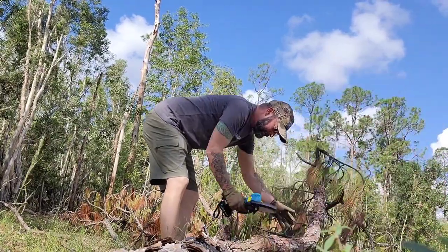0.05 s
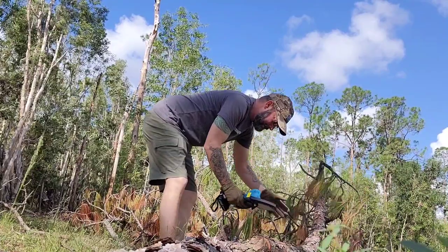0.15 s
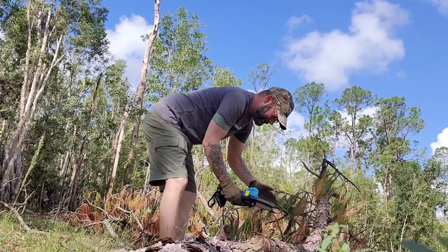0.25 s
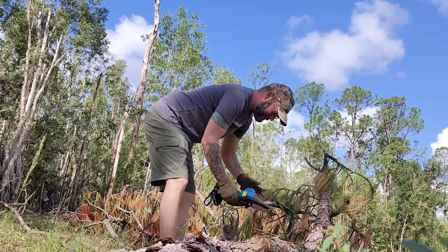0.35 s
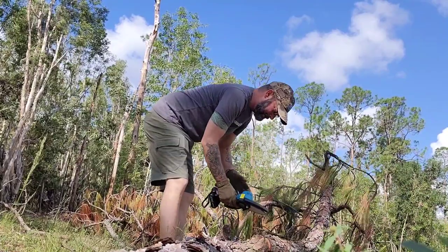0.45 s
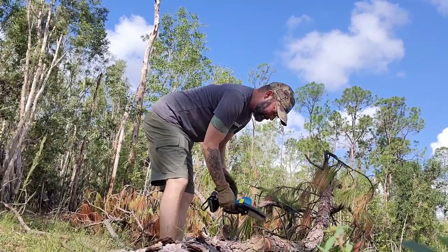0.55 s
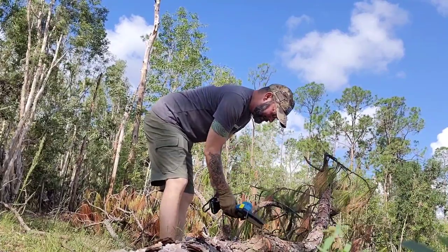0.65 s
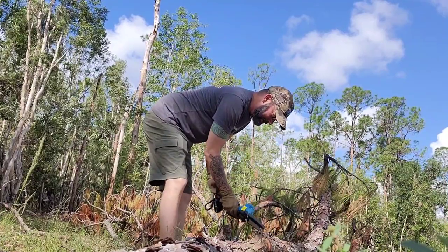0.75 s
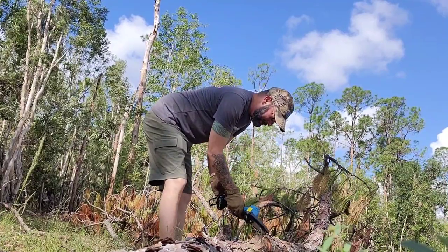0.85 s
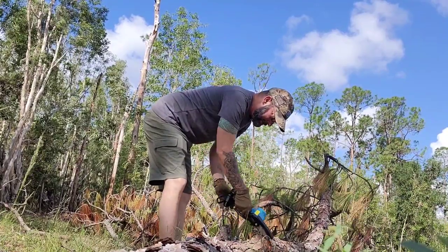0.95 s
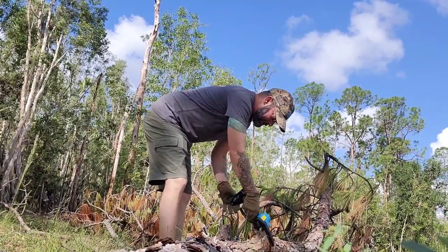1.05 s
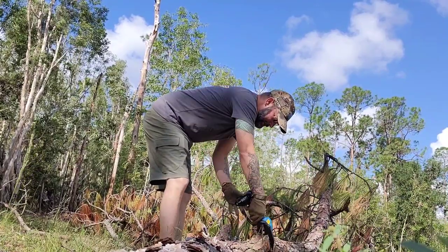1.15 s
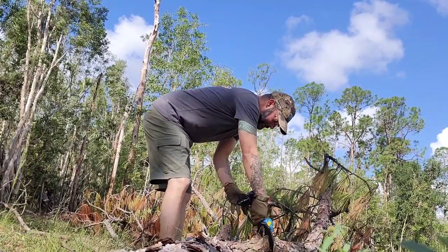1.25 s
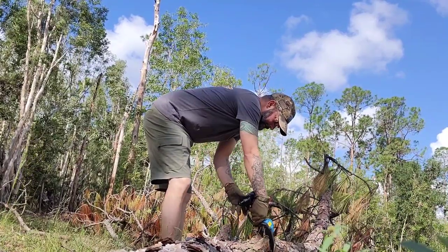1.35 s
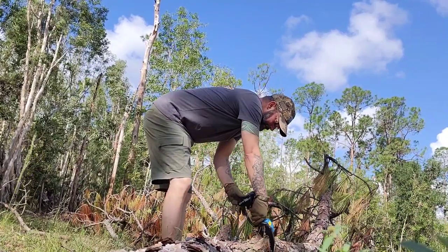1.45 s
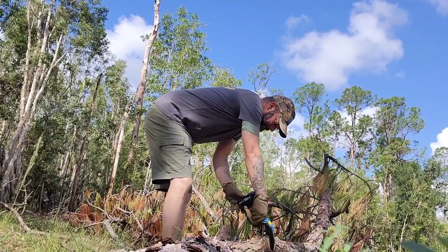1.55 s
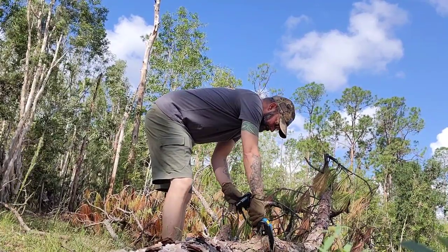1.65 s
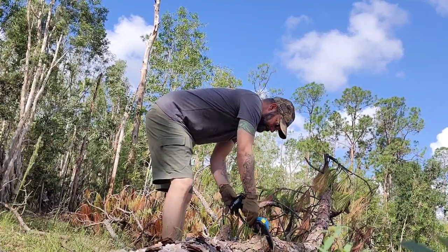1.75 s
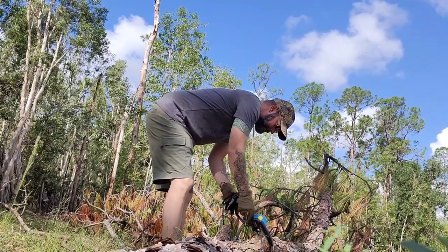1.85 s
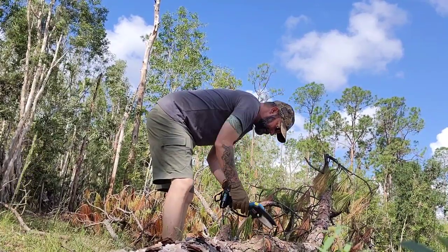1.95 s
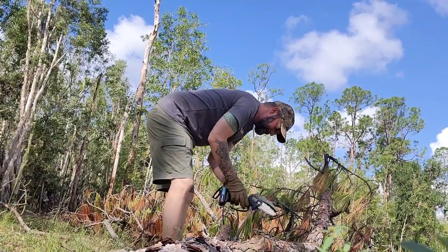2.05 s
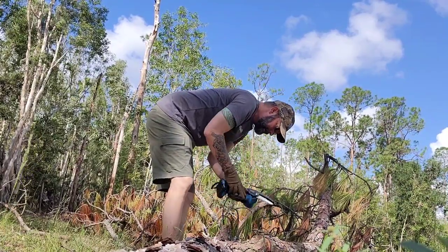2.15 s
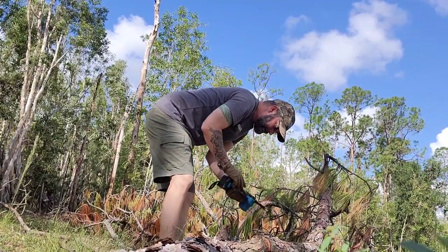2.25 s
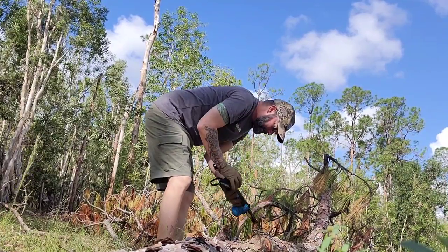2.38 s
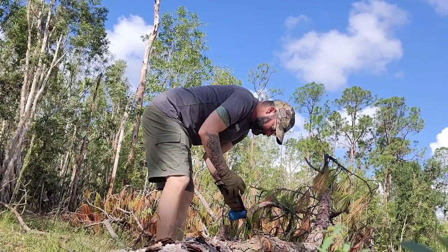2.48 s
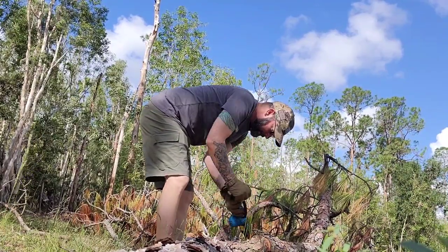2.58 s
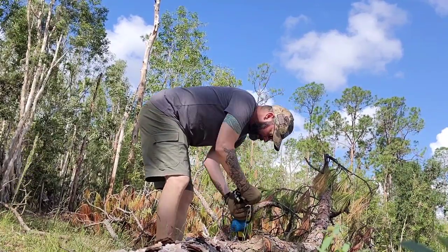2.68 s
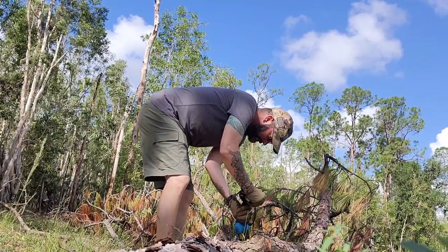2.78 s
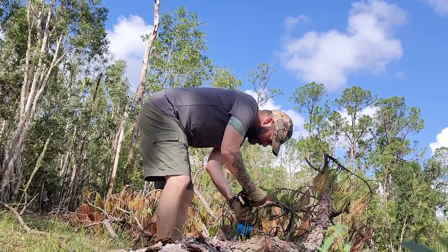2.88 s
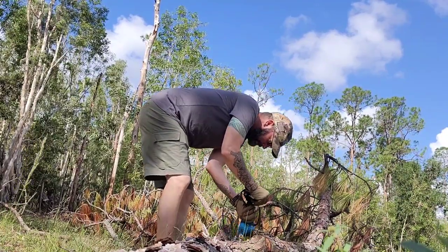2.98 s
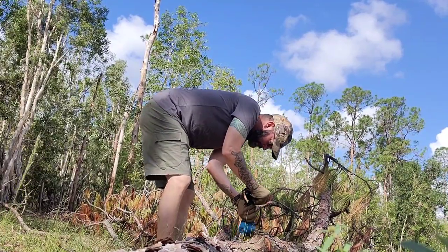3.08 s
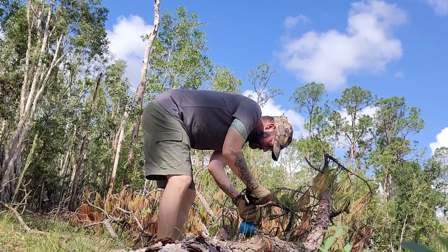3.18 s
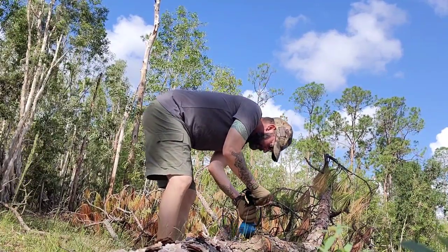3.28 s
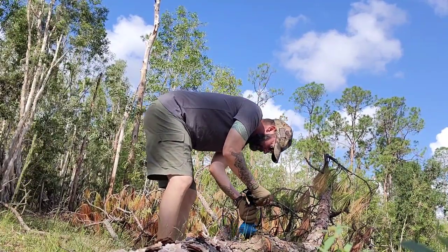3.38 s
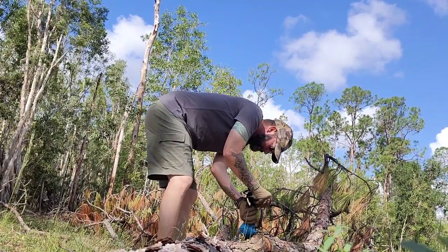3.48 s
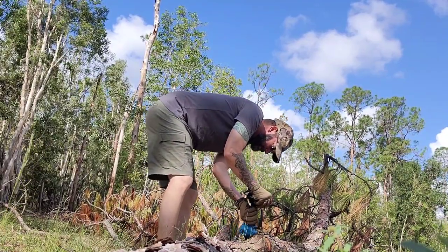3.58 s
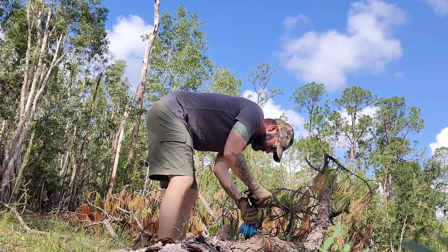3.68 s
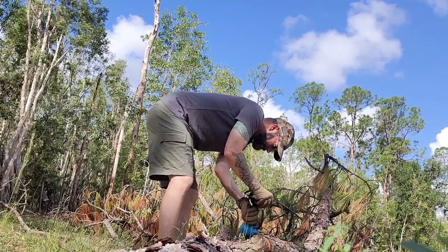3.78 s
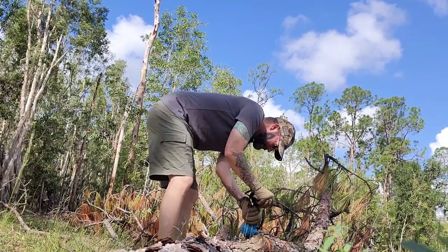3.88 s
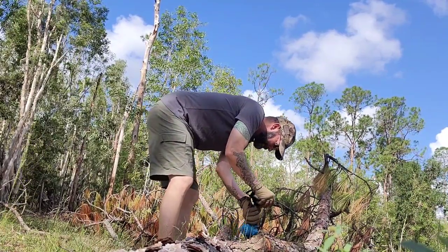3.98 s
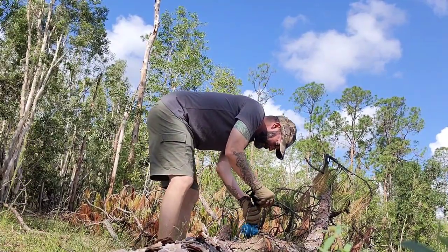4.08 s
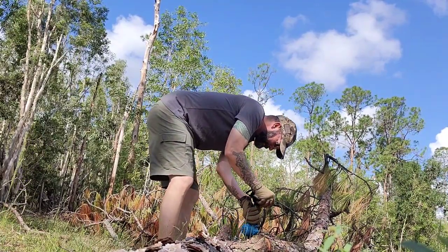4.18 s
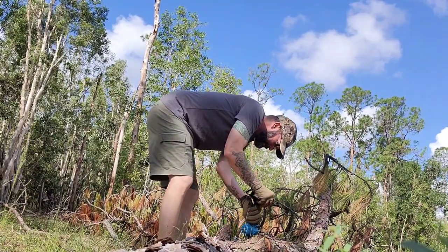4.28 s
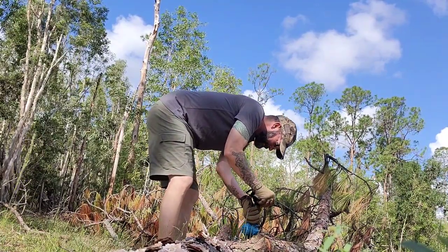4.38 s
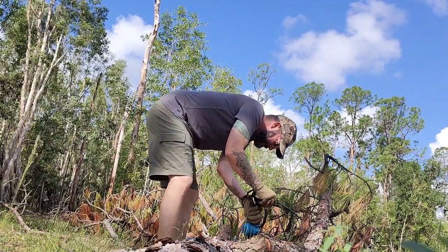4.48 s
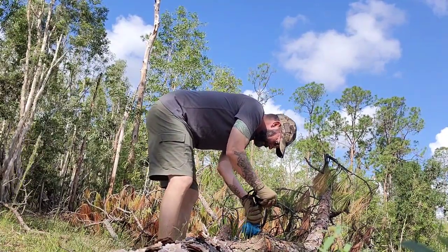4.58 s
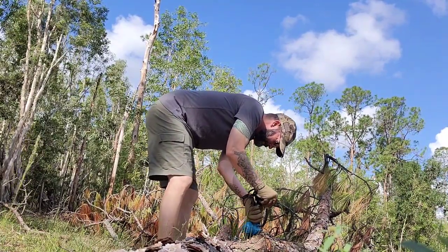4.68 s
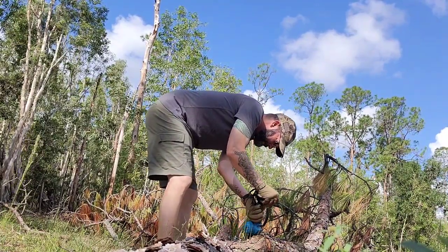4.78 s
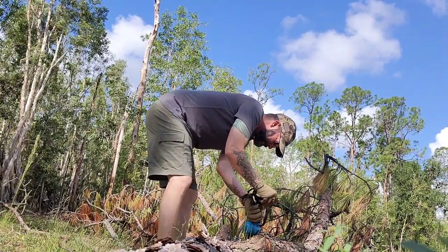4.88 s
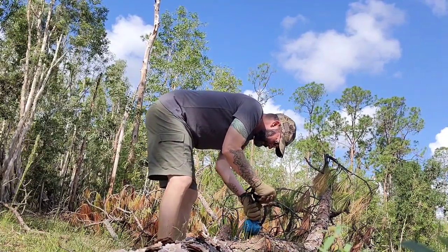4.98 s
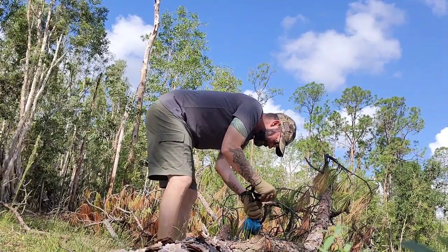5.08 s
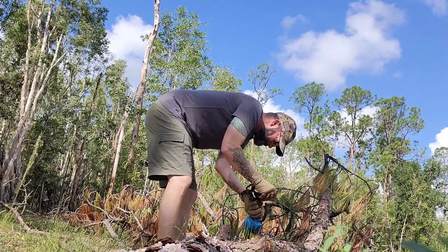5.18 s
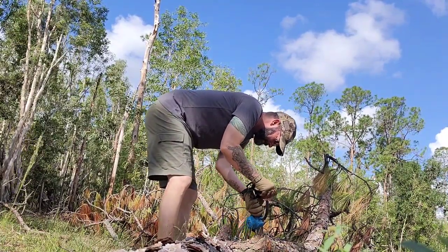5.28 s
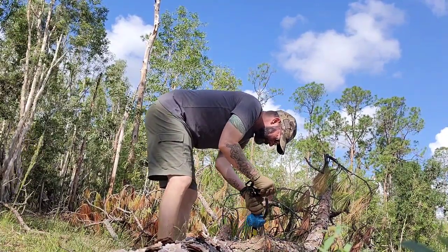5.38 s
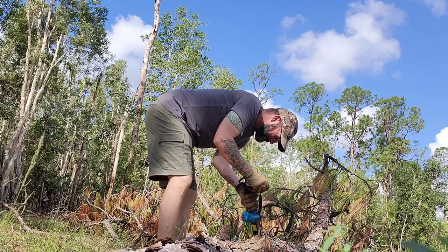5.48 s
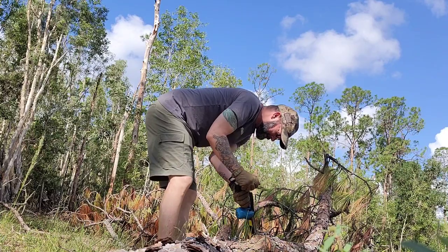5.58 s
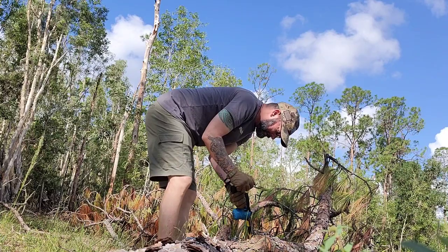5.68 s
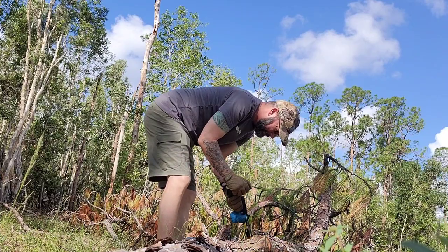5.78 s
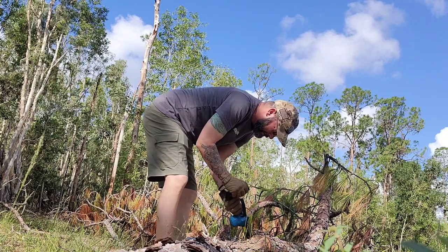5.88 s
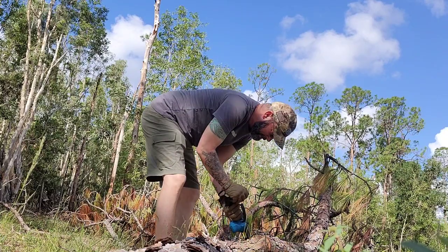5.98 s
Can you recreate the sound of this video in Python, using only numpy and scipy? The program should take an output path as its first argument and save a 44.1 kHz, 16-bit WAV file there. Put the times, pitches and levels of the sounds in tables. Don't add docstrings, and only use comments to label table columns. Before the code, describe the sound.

In an open clearing, closely heard, a small electric chainsaw has just been released: its chain rattles and hisses, slowing to rest by about 1 second. At 0.06 a branch breaks with a very loud, short, woody crack, followed by lesser snaps until 0.25. From 1 to 2.9 it is quiet: a distant engine idles low and steady, insects hiss faintly, and twigs tick, with small knocks near 1.25 and a dry stem crackling at 2.2. At 2.93 the trigger clicks and the motor spins up quickly with a whine. The chain bites the log, tearing and growling, with a hard knock at 3.45; it bogs and shudders around 3.5 to 3.9 and labours on. Harder bites come at 4.8 to 5.2. After 5.35 it breaks free, speeding into a bright rattle, hiss and whine, peaking around 5.7, with the cutting sound returning slightly at the end, around 6.

```python
import sys
import numpy as np
from scipy import signal
from scipy.fft import rfft, irfft, next_fast_len
from scipy.io import wavfile

SR = 44100
rng = np.random.default_rng(int(sys.argv[2]) if len(sys.argv) > 2 else 0)


def unload_wav(signal):
    wavfile.write(
        sys.argv[1],
        SR,
        np.round(np.clip(np.atleast_2d(signal).T, -1, 1) * 32767).astype(np.int16),
    )


def ratio(d):
    e = np.asarray(d, float) / 20
    return 10 ** e


N = 266364
TIME = np.arange(N) / SR


def rms_one(x):
    return x / np.sqrt(np.mean(x ** 2) + 1e-20)


def sine(turns):
    return np.sin(2 * np.pi * turns)


def in_time(rows):
    s, *columns = np.transpose(rows)
    return [np.interp(TIME, s, c) for c in columns]


def at_hz(points, hz):
    table_hz, db = np.transpose(points)
    return np.interp(np.log(np.maximum(hz, 1)), np.log(table_hz), db)


def drift(rate_hz):
    r = np.exp(-32 * np.pi * rate_hz / SR)
    slow = signal.lfilter([1], [1, -2 * r, r * r], rng.standard_normal(N // 16 + 3001))[3000:]
    return np.interp(np.arange(N) / 16, np.arange(len(slow)), rms_one(slow))


def colour(x, spectrum):
    cepstrum = irfft(np.log(ratio(at_hz(spectrum, np.linspace(0, SR / 2, 4097)))))
    cepstrum[1:4096] *= 2
    cepstrum[4097:] = 0
    return rms_one(signal.fftconvolve(x, irfft(np.exp(rfft(cepstrum))))[:N])


def resonate(x, hz, width_hz):
    r = np.exp(-np.pi * width_hz / SR)
    b = np.array([1, 0, -1]) * (1 - r * r) / 2
    return signal.lfilter(b, [1, -2 * r * np.cos(2 * np.pi * hz / SR), r * r], x)


def noise_band(hz, width_hz):
    return rms_one(resonate(resonate(rng.standard_normal(N), hz, width_hz), hz, width_hz))


def grains(per_s, spread_db):
    sizes = ratio(spread_db * np.minimum(rng.exponential(1, N), 5)) * rng.choice([-1, 1], N)
    return rms_one(sizes * (rng.random(N) < per_s / SR))


def spells(rows):
    levels_db = []
    for start_s, end_s, db, swell, fade in rows:
        before_s, after_s = np.maximum(start_s - TIME, 0), np.maximum(TIME - end_s, 0)
        levels_db.append(db - abs(swell) * before_s - abs(fade) * after_s)
    return np.max(levels_db, axis=0)


# time_s, rate_hz
CUTTER_RATE = [(3.05, 122), (3.12, 132), (3.19, 137), (3.3, 135.5), (3.47, 125.5), (3.6, 117), (3.75, 117),
               (3.95, 108), (4.25, 111.5), (4.36, 120), (4.7, 103), (4.9, 112), (4.99, 119.8),
               (5.16, 118.5), (5.22, 126), (5.34, 128.5), (5.44, 139.5), (5.62, 141.7)]
TRIGGER_S = 2.922


def coasting_and_driven():
    coast_s, stop_s, spin_up_s = 0.5, 0.98, 0.05
    coasting = np.exp(-TIME / coast_s) * np.clip(1 - TIME / stop_s, 1e-4, 1)
    driven = np.clip(1 - np.exp(-np.maximum(TIME - TRIGGER_S, 0) / spin_up_s), 1e-4, 1)
    return coasting, driven


def chain_speed(coasting, driven):
    coast_hz = 60.06
    first_s, first_hz = CUTTER_RATE[0]
    starting = coast_hz * coasting + first_hz * driven / driven[round(first_s * SR)]
    return np.where(TIME < first_s, starting, in_time(CUTTER_RATE)[0])


COAST_LEVEL = [-42.5, -44.5, -50, -42.5]
SPEED_EXPONENT = [1.4, 1.23, 1.02, 1.6]
# time_s, bite_db, bar_clear_of_kerf_db
CUT_COURSE = [(2.95, -62, -1), (3.04, -52, -0.5), (3.28, -46.5, 1), (3.5, -44.5, -0.5), (3.7, -41, 3),
              (4.0, -39, 0.9), (4.3, -39, 3), (4.72, -37, 5.5), (4.77, -35.5, 5.5), (4.92, -41.5, 1.5),
              (5.12, -36, 7), (5.22, -45.5, 8.5), (5.34, -37.5, 8.5), (5.37, -60, 5.5), (5.62, -79, 12.5),
              (5.92, -55, 9), (6.04, -47, 4)]
# time_s, extra_bite_db, length_s
HARD_SPOTS = [(3.05, 10, .02), (3.345, 6.5, 0.032), (3.447, 6.5, 0.033), (3.55, 9, 0.055), (3.79, 4, 0.11),
              (3.933, 9.5, 0.0095), (4.203, 5.5, 0.077), (4.35, 3.5, .04), (4.746, 1, .015),
              (4.85, 10.5, 0.11), (5.04, 7.5, 0.063), (5.245, 13, 0.016), (5.31, 0.5, 0.0076)]


def layer_levels(coasting, driven):
    bite_db, clear_db = in_time(CUT_COURSE)
    grab_db = sum(db * np.exp(-((TIME - s) / length_s) ** 2) for s, db, length_s in HARD_SPOTS)
    running = [bite_db + grab_db,
               -38 + 0.13 * clear_db + 0.22 * grab_db,
               -47.5 + 0.78 * clear_db + 0.46 * grab_db,
               -41.5 + clear_db + 0.5 * grab_db]
    return [np.maximum(start_db + 20 * steep * np.log10(coasting), run_db + 20 * np.log10(driven))
            for start_db, steep, run_db in zip(COAST_LEVEL, SPEED_EXPONENT, running)]


def cutter_knocks(turns, log_db):
    contact_db, span_db = -52, 10
    passes = np.diff(np.floor(turns + 0.025 * drift(60)), prepend=0) > 0
    clicks = rms_one(passes * ratio(1.28 * rng.standard_normal(N)))
    return clicks * np.clip((log_db - contact_db) / span_db, 0, 1)


# freq_hz, density_db
LOG_RING = [(88, -66.5), (150, -11), (210, -2), (225, -6.5), (286, -7.5), (352, 0), (412, -6), (483, -4.5),
            (571, -3), (618, -9), (732, -1), (816, -0.5), (1170, -9), (1600, -13.5), (2080, -35.5),
            (3520, -120)]


def torn_log(knocks, log_db, growl_db):
    loosening_db = np.clip(0.4 * (growl_db + 52), 0, 5)
    tearing = grains(2500, spread_db=3.5) * ratio(1.5 * drift(25))
    return ratio(log_db - loosening_db) * colour(0.5 * knocks + tearing, LOG_RING)


# freq_hz, density_db
LINK_RING = [(530, -17.5), (900, -9.5), (1100, -6.5), (1290, -11.5), (1640, 3), (1910, -4), (2090, 2),
             (2290, 1.5), (2870, -1), (3370, -13.5), (3800, -14.5), (4180, -16), (4500, -15.5), (5850, -28),
             (9900, -120)]


def link_rattle(knocks, rattle_db, swing):
    gain = ratio(rattle_db + 0.91 * drift(28)) * swing
    return [gain * colour(grains(5000, spread_db=2) + 0.15 * knocks, LINK_RING) for part in range(3)]


# freq_hz, density_db
GROOVE_HISS = [(2650, -45.5), (4500, -11), (5170, -2), (5390, 1), (5830, -11.5), (6560, -0.5), (7300, 0.5),
               (7900, 2.5), (9230, -4), (10100, -3), (11400, -26), (12000, -10), (15600, -32),
               (22000, -120)]
# freq_hz, density_db
CHIP_SPRAY = [(6940, -37), (11800, -3.5), (12300, -7), (12800, 0), (15100, 3), (15800, -2)]


def groove_hiss(hiss_db, spray_db, swing):
    flicker = ratio(drift(60)) * swing
    parts = []
    for part in range(3):
        sizzle = grains(12000, spread_db=3.5)
        hiss = ratio(hiss_db) * colour(sizzle, GROOVE_HISS)
        spray = ratio(spray_db) * colour(sizzle, CHIP_SPRAY)
        parts.append(flicker * (hiss + spray))
    return parts


# multiple, level_db
GROWL_ORDERS = [(1, -18), (2, -8), (3, -17), (4, -2), (5, -12), (6, -2), (7, -1), (8, -1), (9, -11),
                (10, -9), (11, -14), (12, -7), (13, -11)]


def cutter_growl(turns, growl_db):
    uneven = turns + 0.005 * drift(25)
    growl = np.zeros(N)
    for k, db in GROWL_ORDERS[1:]:
        growl += ratio(db + 2.95 * drift(3.2)) * np.sin(2 * np.pi * k * uneven + k * k)
    return ratio(growl_db) * growl


# cutter_rate_multiple, level_db
SPROCKET_LINES = [(4, -11), (4.57, -18), (8.57, -7), (10, -12), (12, -7), (12.57, -7)]


def sprocket_whine(turns, whine_db):
    turns = turns + 0.0041 * drift(27)
    whine = ratio(2.6 * drift(10)) * sine(8 * turns)
    for k, db in SPROCKET_LINES:
        whine += ratio(db + 2.5 * drift(15)) * sine(k * turns)
    bar_ring = 1.4 * ratio(whine_db + 42) * noise_band(1740, 300)
    return ratio(whine_db) * (whine + bar_ring)


def handle_shudder(turns, shudder_db):
    shake = sine(turns) + 0.45 * rms_one(resonate(rng.standard_normal(N), 65, 70))
    return ratio(shudder_db + 2.9 * drift(10)) * shake


def motor_whine(turns, motor_db):
    return ratio(motor_db + 5 + 3 * drift(25)) * sine(40.5 * (turns + 0.0025 * drift(40)))


# start_s, end_s, level_db, swell_db_per_s, fade_db_per_s
GROWL_SPELLS = [
    (3.25, 4.7, -52, 30, 100),
    (4.78, 5.0, -39.5, 130, 80),
    (5.0, 5.17, -42, 50, 200),
    (5.19, 5.335, -46, 200, 500),
]
WHINE_SPELLS = [
    (3.08, 3.42, -48.5, 200, 100),
    (4.78, 5.3, -50, 180, 100),
    (5.62, 5.87, -42, 20, 150),
    (5.38, 6.04, -52, 150, 50),
]
SHUDDER_SPELLS = [
    (3.5, 3.87, -47, 60, 60),
    (3.9, 4.4, -55, 50, 25),
]
MOTOR_SPELLS = [
    (3.08, 3.56, -54.5, 150, 130),
    (5.2, 5.38, -58, 90, 60),
]


def saw():
    coasting, driven = coasting_and_driven()
    turns = np.cumsum(chain_speed(coasting, driven)) / SR
    log_db, rattle_db, hiss_db, spray_db = layer_levels(coasting, driven)
    power_db = np.where(TIME > TRIGGER_S, 0, -80)
    growl_db = spells(GROWL_SPELLS) + power_db
    whine_db = spells(WHINE_SPELLS) + power_db
    shudder_db = spells(SHUDDER_SPELLS) + power_db
    motor_db = spells(MOTOR_SPELLS) + power_db

    knocks = cutter_knocks(turns, log_db)
    swing = 1 + 0.051 * np.cos(2 * np.pi * turns)
    rattle = link_rattle(knocks, rattle_db, swing)
    hiss = groove_hiss(hiss_db, spray_db, swing)
    tones = sprocket_whine(turns, whine_db) + handle_shudder(turns, shudder_db)
    tones += motor_whine(turns, motor_db) + cutter_growl(turns, growl_db)
    direct = torn_log(knocks, log_db, growl_db) + rattle[0] + hiss[0] + np.sqrt(2) * tones
    return direct, ratio(-6.5) * np.array(rattle[1:]) + ratio(-4) * np.array(hiss[1:])


# multiple, level_db
ENGINE_ORDERS = [(1, -19), (2, -36), (3, -4.5), (4, -6), (5, 0), (6, -6), (7, -19), (8, -10), (9, -34.5),
                 (10, -22), (11, -7.5), (12, -16.5), (13, -16), (14, -15.5), (15, -39.5), (16, -20.5),
                 (17, -18.5), (18, -22), (19, -24.5), (20, -24.5), (21, -18), (22, -23), (23, -21),
                 (24, -17.5)]
# freq_hz, side_over_mid_db
ENGINE_SIDE = [(30, -4.5), (60, -2), (125, -11), (250, -1), (400, -3)]
# time_s, level_db
ENGINE_LEVEL = [(0, -52.5), (3.4, -51.5), (5.4, -52.5), (6.04, -60)]


def idling_engine():
    idle_hz = 16.15
    turns, out = idle_hz * TIME + 0.015 * drift(1.84), np.zeros((2, N))
    for (k, db), start in zip(ENGINE_ORDERS, rng.random(len(ENGINE_ORDERS))):
        twist = np.arctan(ratio(at_hz(ENGINE_SIDE, k * idle_hz)))
        tone = np.sin(2 * np.pi * (k * turns + start) + np.array([[twist], [-twist]])) / np.cos(twist)
        out += ratio(-2 + db + 2.2 * drift(2.3)) * tone
    return out * ratio(in_time(ENGINE_LEVEL)[0])


# freq_hz, density_db
AIR_MID = [(15, -41.5), (25, -0.5), (86, -5), (148, -26), (184, -13), (254, -32), (351, -33.5),
           (472, -17.5), (602, -28), (2320, -42.5), (2650, -44), (3660, -36.5), (7580, -34), (10500, -43.5),
           (15700, -48)]
# freq_hz, density_db
AIR_WIDTH = [(15, -38), (25, -22), (86, -10), (113, -24.5), (184, -20), (247, -23), (424, -38.5),
             (472, -17), (602, -26.5), (854, -23.5), (2650, -41.5), (3860, -33), (8000, -27), (10200, -41),
             (15700, -44.5)]
# freq_hz, width_hz, level_db
INSECT_BANDS = [(4000, 900, -75), (4560, 33, -80), (5590, 79, -74), (5960, 390, -80), (6500, 50, -73.5),
                (7200, 110, -73.5), (7780, 130, -73.5), (8430, 640, -70.5)]


def clearing():
    mid = ratio(-56) * colour(rng.standard_normal(N), AIR_MID)
    side = ratio(-63.5) * colour(rng.standard_normal(N), AIR_WIDTH)
    out = mid + side * [[1], [-1]]
    for hz, width_hz, db in INSECT_BANDS:
        song = resonate(resonate(rng.standard_normal((2, N)), hz, width_hz), hz, width_hz)
        out += ratio(db + 2 * drift(2.5)) * rms_one(song)
    return out


# time_s, peak_db, ring_hz, brightness_db, t60_s
BRANCH_BREAK = [
    (.052, -29, 750, -25, .03),
    (.0578, -25, 780, -25, .02),
    (.0624, 0, 760, -38, .017),
    (.062, -14, 330, -35, .05),
    (.061, -20, 180, -40, .07),
    (.063, -15, 540, -35, .035),
    (.0668, -27, 7000, -8, .01),
    (.0688, -24, 640, -22, .04),
    (.077, -30, 900, -25, .025),
]
WOOD_SNAPS = [(0.136, -23, 751, -15, 0.038), (0.206, -28.5, 840, -26, 0.072),
              (0.229, -24.5, 727, -16, 0.024), (0.545, -39, 846, -20, .04), (0.59, -44, 900, -20, .03),
              (0.71, -45, 810, -20, 0.04), (1.179, -61, 480, 0, 0.02), (1.243, -32.5, 517, -16, 0.027),
              (1.313, -31, 680, -24, 0.022), (2.209, -25.5, 564, -16, 0.02), (2.225, -30.5, 750, -7, 0.027),
              (3.03, -30.5, 754, -15, 0.07), (3.449, -15.5, 535, -14, 0.039), (3.959, -26, 595, -7, 0.024),
              (4.078, -37, 778, -11, 0.015)]
TWIG_TICKS = [(0.0623, -17.5, 2600, -0.5, 0.011), (0.0664, -17, 2830, -29, 0.0095),
              (0.341, -41, 2120, -4, 0.098), (0.5694, -54, 2120, -9, 0.025), (0.6194, -51, 2570, 2, 0.013),
              (0.7294, -60, 2010, -11, 0.032), (0.8387, -54, 1590, -7, 0.054), (1.029, -50, 1860, 5, 0.018),
              (1.1808, -40, 1850, -8, 0.016), (1.248, -45, 1750, -11, 0.02),
              (1.2576, -45.5, 2490, -8, 0.026), (1.314, -38, 1800, -21, 0.021),
              (1.688, -52.5, 2460, -12, 0.029), (1.7305, -54, 2260, -11, 0.023),
              (1.75, -50.5, 2100, -16, 0.031), (1.8442, -40, 1950, 0, 0.014), (1.85, -41.5, 1560, -21, .03),
              (2.1704, -52, 2000, -18, 0.023)]
STEM_AND_TRIGGER = [
    (2.2024, -44, 2740, -19, 0.022),
    (2.2105, -28.5, 2410, -40, 0.039),
    (2.2144, -28, 2370, -27, 0.027),
    (2.224, -34, 2450, -26, 0.015),
    (2.2264, -24.5, 2340, -28, 0.017),
    (2.2394, -46, 2400, -10, 0.034),
    (2.2774, -53, 2450, -8, 0.061),
    (2.8933, -49, 2470, -19, 0.053),
    (2.9307, -37.5, 2840, -12, 0.042),
]


def snaps():
    out, t = np.zeros(N + 4000), np.arange(4000) / SR
    breaks = list(BRANCH_BREAK) + list(WOOD_SNAPS) + list(TWIG_TICKS) + list(STEM_AND_TRIGGER)
    for s, peak_db, hz, bright_db, t60_s in breaks:
        noise = rng.standard_normal(4000)
        fall = ratio(-60 * t / np.clip(t60_s, 0.003, 0.09)) * (1 - np.exp(-1.6 * hz * t))
        ring = sine(hz * t) * fall ** 2.5
        splinter = 1.59 * resonate(noise * fall, hz, 0.55 * hz)
        tick = ratio(bright_db - 0.5) * np.diff(noise, prepend=0) * fall ** 2
        i = round(s * SR)
        out[i:i + 4000] += ratio(peak_db + 3) * (0.8 * ring + 0.5 * splinter + tick)
    return out[:N]


# freq_hz, left_over_right_db
PORT_LEVEL = [(60, 14), (110, 7), (200, -3.5), (380, -1.5), (700, -0.5), (1290, -1.5), (2380, 1),
              (4400, 1.5), (8120, -12), (15000, -0.5)]
# freq_hz, left_lead_rad
PORT_LEAD = [(0, 3.5), (200, 2), (290, 3), (400, 0.5), (1890, 0.67), (3360, -2), (3880, -2.5), (4130, 0.5),
             (4480, -2), (5250, -1.5), (5850, -6), (7060, -3.5), (7580, -2), (11500, -3), (12600, -5),
             (16700, -5.5)]
# freq_hz, level_db
BRUSH_ECHO = [(100, -6), (600, -12), (2000, -8), (5000, -7), (15000, -7)]


def ports(x):
    brush_t60_s = 0.067
    size = next_fast_len(N + SR // 2)
    hz = np.arange(size // 2 + 1) * SR / size
    half = ratio(at_hz(PORT_LEVEL, hz) / 2) * np.exp(0.5j * np.interp(hz, *np.transpose(PORT_LEAD)))
    blur = rng.standard_normal((2, SR // 4)) * ratio(-60 * TIME[:SR // 4] / brush_t60_s)
    blur /= np.sqrt(np.sum(blur ** 2, axis=1, keepdims=True))
    echo = rfft(blur, size) * ratio(at_hz(BRUSH_ECHO, hz))
    return irfft(rfft(x, size) * np.array([half, 1 / half]) * (1 + echo), size)[:, :N]


def scene():
    direct, spread = saw()
    return ports(direct + snaps() + spread) + idling_engine() + clearing()


def band_limit(x):
    return signal.sosfilt(signal.butter(12, 17100, fs=SR, output="sos"), x)


def record(dry):
    top_cut = signal.ellip(10, 0.5, 45, 15880, fs=SR, output="sos")
    return band_limit(signal.sosfilt(top_cut, dry))


dry = scene()
out = record(dry)
unload_wav(out)
```